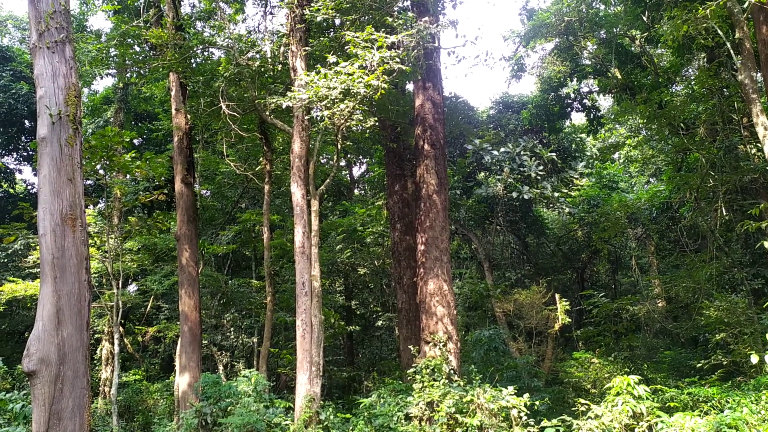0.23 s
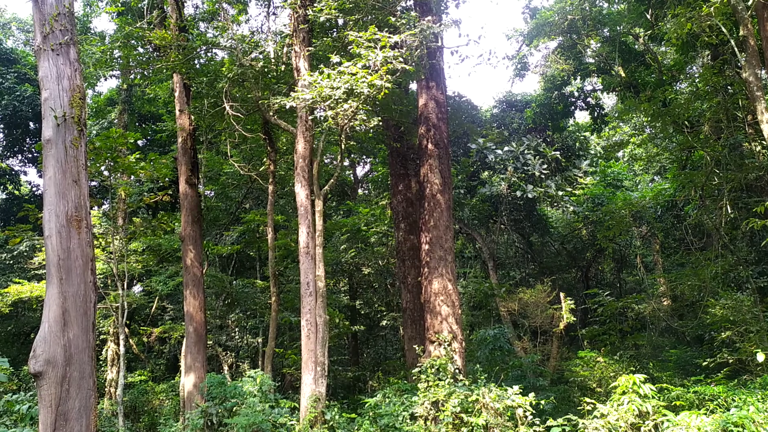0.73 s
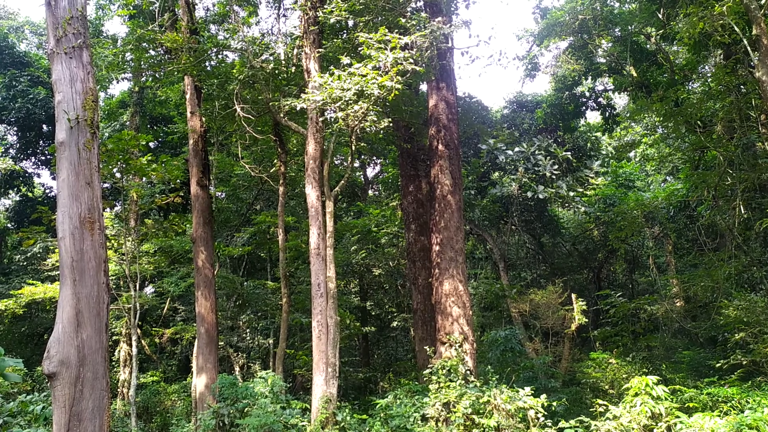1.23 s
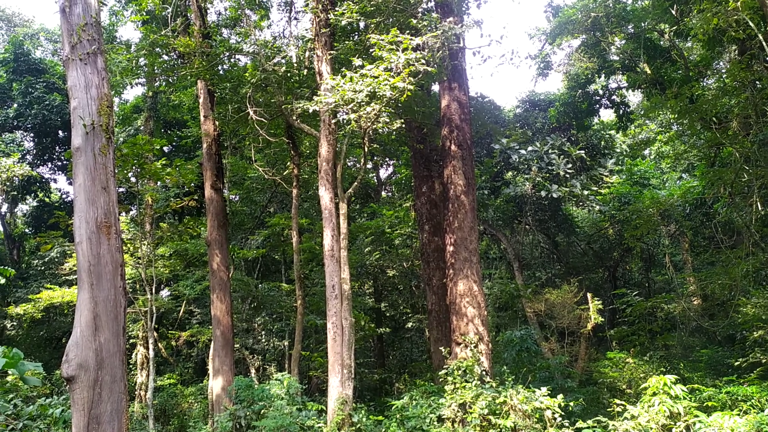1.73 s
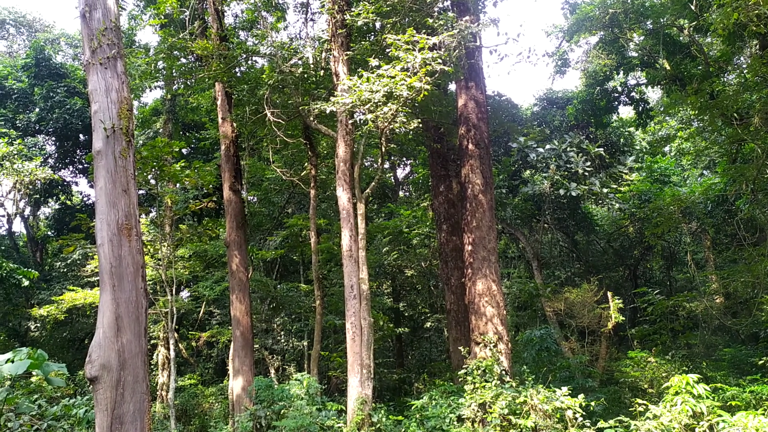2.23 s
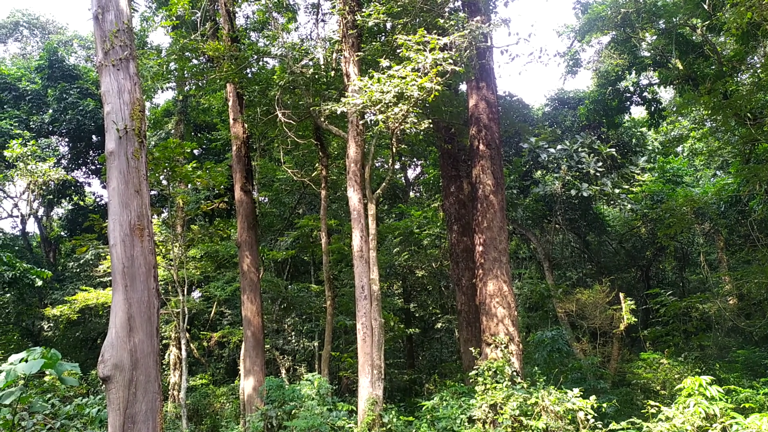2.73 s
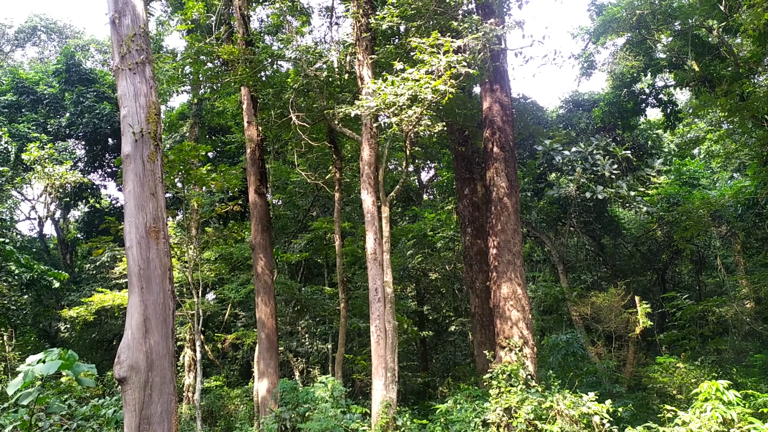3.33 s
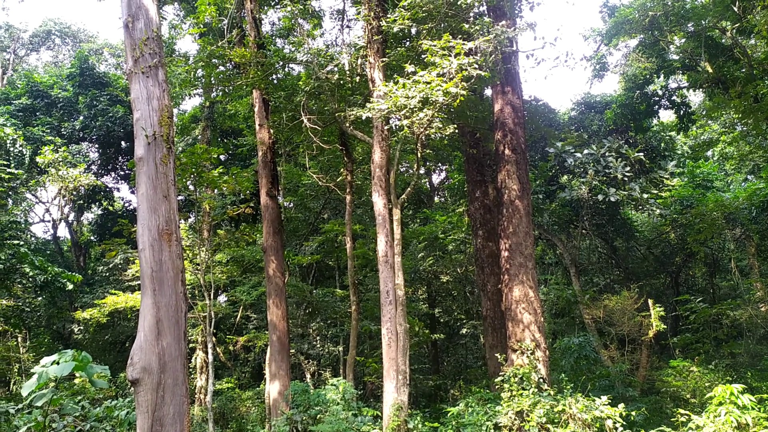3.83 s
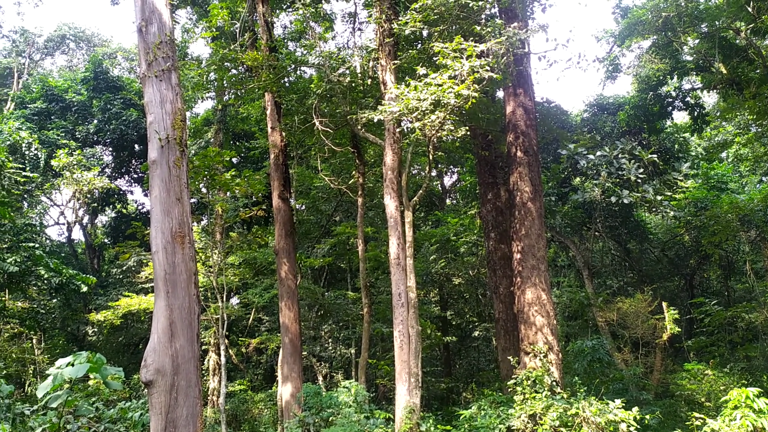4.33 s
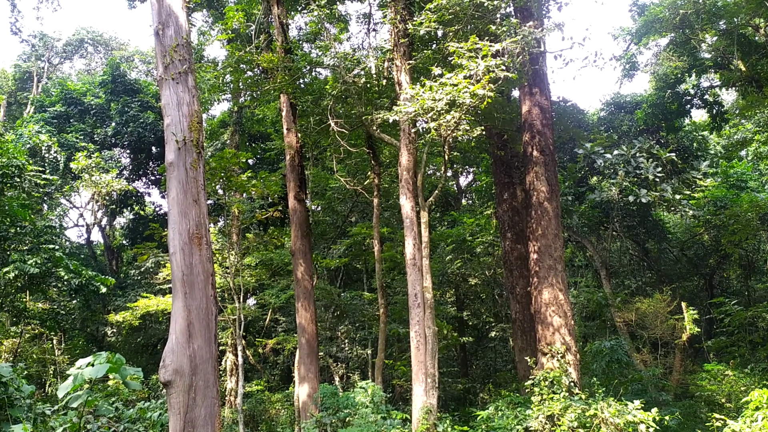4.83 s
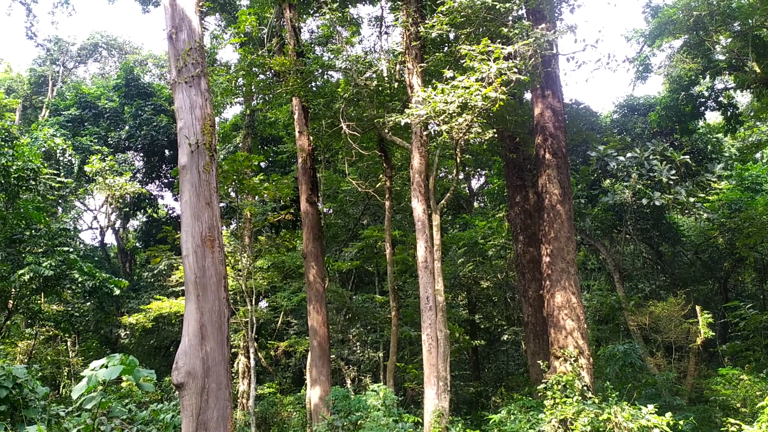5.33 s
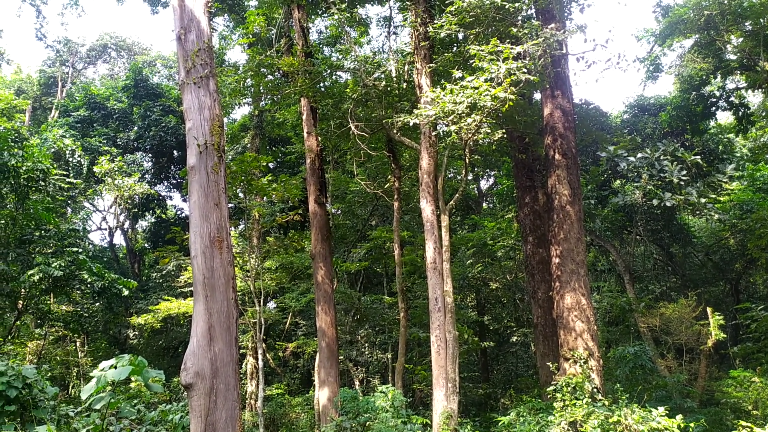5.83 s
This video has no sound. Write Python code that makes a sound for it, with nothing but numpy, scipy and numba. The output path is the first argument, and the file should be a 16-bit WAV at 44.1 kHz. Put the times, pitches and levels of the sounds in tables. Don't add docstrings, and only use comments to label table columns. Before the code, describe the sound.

For the full six seconds a dense cicada chorus rings in a forest, already at full strength at the start and never pausing. It is a hard, glassy, electric whine stacked at roughly 3, 6 and 9 kHz, the two lower tones strongest, trembling with fast beats between many singers over a hazy far chorus. The pitch stays steady; the loudness swells slightly and the image sways, upper tones leaning left. Fingers on the handheld recorder add small dull ticks and rubs, frequent from 0 to 1.1 s, with soft low bumps near 1.0, 1.7 and, most clearly, 1.8 s. Light touches follow around 2.4 and 2.8-3.0 s, then a quieter gap until about 4 s, a cluster at 4.1-4.7 s, and last taps near 5.2, 5.4 and 5.85 s. Faint low air and a distant engine hum sit far beneath. The treble is slightly grainy; the chorus continues to the cut.

```python
import sys
import numpy as np
from scipy import signal
from scipy.fft import rfft, irfft, next_fast_len
from scipy.io import wavfile
from scipy.ndimage import uniform_filter1d
from numba import njit

SR = 44100
rng = np.random.default_rng(int(sys.argv[2]) if len(sys.argv) > 2 else 0)


def rack_gain(trim_db):
    fader = np.asarray(trim_db, float)
    return 10 ** (fader / 20)


def unload_audio(sound):
    columns = np.transpose(np.atleast_2d(sound))
    steps = np.round(np.clip(columns, -1, 1) * 32767)
    wavfile.write(sys.argv[1], SR, steps.astype(np.int16))


N = 267819

OVERTONE_DB = [-91, -65, -70, -39.5, -65.5, -62.5, -75, -67.5, -78, -71.5, -83, -63, -62.5, -35, -62.5,
               -59.5, -76, -66.5, -70.5, -71, -74.5, -61.5, -67.5, -49.5, -69, -65, -80, -71, -82, -77, -77,
               -75.5, -87, -61, -80, -85, -81, -78, -83, -78, -85, -80, -89, -70]
# drum rate off the mean f/Hz, level/dB, left minus right/dB
SINGERS = [(1.6, -10, -1), (1.3, -5.5, 1), (1.0, -2.5, 0), (.75, -1.5, 1), (.55, -.8, 2), (.3, -.6, 1),
           (.05, -.7, 0), (-.2, -1.5, -1), (-.5, -2.5, -1), (-.8, -3.5, -1), (-1.1, -5, -1),
           (-1.45, -7, -2), (-1.8, -10, -2), (-2.3, -15, 0), (-2.8, -19, 0), (-3.3, -21, 0), (-3.8, -21, 0),
           (-4.2, -21, 0), (-4.6, -21, -1), (-5.0, -22, 0), (-5.5, -24, 0)]
# f/Hz, level/dB (per Hz)
FAR_CHORUS = [(2000, -47.5), (2500, -16.5), (3000, 1), (3500, -17), (4900, -18), (5400, -10), (6000, -4),
              (7800, -14.5), (9000, -1), (9700, -18.5), (10800, -17.5), (11600, -9.5), (14000, -21.5),
              (15000, -30), (15200, -28)]
# low f/Hz, high f/Hz
RINGS_HZ = [
    (2870, 3040),
    (5780, 6020),
    (8670, 9030),
]
# level/dB, left minus right/dB, random swell/dB, random sway/dB
RING_LEVELS = [
    (-42, 0, 1.08, 3.5),
    (-39.5, 6.5, 0.88, 2.5),
    (-49, 4, 0.93, 1.5),
]
# f/Hz, left minus right/dB
PORTS = [(2000, 0.5), (4500, -0.7), (5500, 3.5), (7500, 3.5), (10000, 5), (12000, 7.5), (14000, 2.5)]
# t/s, low ring favoured over high rings/dB, left port towards the singers/dB
TURN = [(0, 1, 1.5), (.6, 0.5, 0), (1.2, 1, -1), (1.8, -1.5, -1), (2.2, 2, -2), (2.8, 1, 0),
        (3.3, -0.5, -0.5), (3.8, 0, -1.5), (4.3, .5, -.5), (5, -1, 1), (5.5, -0.5, -0.5), (6.07, 0, -1)]
# t/s, tick level/dB, thump level/dB, brightness/dB
FINGERS = [(0.04, -65.5, -72, -12), (0.169, -52, -69, -14), (0.305, -58.5, -73, -8), (0.568, -60, -76, -6),
           (0.647, -59, -76, -5.5), (0.681, -52.5, -78, -11), (0.881, -54.5, -65, -5.5),
           (0.987, -53, -51, -18), (1.067, -46.5, -60, -21), (1.375, -53, -66, -7), (1.674, -67, -43, -14),
           (1.794, -40, -46, -31), (1.993, -57, -64, -5.5), (2.403, -60, -81, -11), (2.423, -52, -78, 0),
           (2.81, -56, -69, -17), (2.987, -61, -72, -8), (3.035, -62, -74, -14), (3.96, -62, -77, -17),
           (4.124, -61, -62, -2), (4.277, -56, -65, -11), (4.375, -63.5, -67, -5), (4.469, -62, -56, -1),
           (4.622, -63, -77, -4), (4.667, -57.5, -78, -4), (5.206, -62.5, -74, -5), (5.417, -55, -78, 1.5),
           (5.828, -63, -78.5, -4), (5.87, -56, -67, -21)]
# start t/s, length/s, rumble level/dB, rustle level/dB, squeak level/dB
SLIDES = [(0, 0.072, -68, -69.5, -80), (0.168, 0.024, -74, -64.5, -68.5), (0.873, 0.032, -67, -64, -63.5),
          (1.0, .03, -55, -63, -76), (1.08, .04, -58, -63, -74), (1.25, .05, -70, -72, -64),
          (1.152, 0.35, -70.5, -72, -70), (1.67, .1, -53, -68, -84), (1.795, .03, -54, -64, -83),
          (1.85, .24, -64, -74, -78), (2.396, 0.025, -76, -66.5, -69.5), (2.797, .05, -66, -73, -74),
          (3.196, .12, -72, -84, -85), (4.098, .07, -72.5, -77, -82), (4.47, .06, -66, -74, -80),
          (4.6, .1, -76, -69, -76), (5.046, 0.053, -78, -80, -80), (5.833, 0.053, -75, -70, -73.5)]
HOLD_DB = [
    -79,
    -78,
    -84,
]
# f/Hz, level/dB (per Hz)
AIR = [(25, -34), (45, -2.5), (63, -3.5), (80, -13.5), (110, -6.5), (240, -16), (600, -19.5), (1300, -22.5),
       (2100, -21.5), (2600, -41), (4000, -92)]
# f/Hz, level/dB
ROUNDING_STEP = [(300, -20.5), (900, 0), (2200, -4), (3000, -5), (3500, 7.5), (5100, 8), (5900, -10.5),
                 (7000, 5), (7900, 7), (8900, -11), (10200, 10), (11800, -3.5), (13500, 5.5), (15000, 2),
                 (15400, 15)]

DRUM_HZ, CYCLE_POINTS = 296.3, 1 << 14
CHORUS_DB, FAR_DB = -33.5, -21
SWELL_PER_S, SWAY_PER_S = 7, 9
TICK_HZ, HZ_PER_BRIGHT_DB, HZ_PER_THUMP_DB, TICK_PAN_DB = 235, 4, -4.5, 5
SLIDE_ATTACK_S, SLIDE_RELEASE_S = 0.013, 0.031
AIR_DB, HUM_HZ, HUM_DB = -72.5, 52.3, -70.5
TIME = np.arange(N) / SR
SIZE = next_fast_len(N, True)
FREQ = np.arange(SIZE // 2 + 1) * SR / SIZE + 1


def chorus():
    song = np.zeros((2, N))
    for off_hz, db, pan_db in SINGERS:
        singer = cicada(DRUM_HZ + off_hz, drift=.0008, tremble=.001, patchy_db=2.5, leaves_db=2.5)
        song += rack_gain(db) * sides(pan_db)[:, None] * singer
    uneven = 1 + 0.045 * flutter(corner_hz=46.2, flare_db=4.0)
    song = shimmer(level(song, 0) * uneven, spread_db=1.0, size=8, count=4)
    far = shimmer(colour(rng.standard_normal((2, N)), FAR_CHORUS), spread_db=5.5, size=5, count=3)
    song = song + level(far, FAR_DB)

    t, *columns = np.transpose(TURN)
    favour_db, turn_db = (np.interp(TIME, t, c) for c in columns)
    spectrum = rfft(song, SIZE)
    inside = [(FREQ >= lo) & (FREQ < hi) for lo, hi in RINGS_HZ]
    facing = sides(np.interp(FREQ, *np.transpose(PORTS)))
    weak = spectrum * facing * ~np.any(inside, axis=0)
    out = rack_gain(CHORUS_DB) * irfft(weak, SIZE)[:, :N]
    for mask, (db, pan_db, swell_db, sway_db), lean in zip(inside, RING_LEVELS, (1, -.5, -.5)):
        rings = even(irfft(spectrum * mask, SIZE)[:, :N], 0.13)
        gain = rack_gain(db + 3.0 + lean * favour_db + swell_db * walk(SWELL_PER_S))
        pan = sides(pan_db + turn_db + sway_db * walk(SWAY_PER_S))
        out = out + rings * gain * pan
    return out


def cicada(hz, drift, tremble, patchy_db, leaves_db):
    turns = np.cumsum(hz * (1 + drift * walk(1.5) + tremble * walk(9))) / SR
    ports = []
    for _ in range(2):
        chance = rng.standard_normal((2, len(OVERTONE_DB)))
        lines = np.zeros(CYCLE_POINTS // 2 + 1, complex)
        heights = rack_gain(np.add(OVERTONE_DB, patchy_db * chance[0]))
        lines[7:7 + len(OVERTONE_DB)] = heights * np.exp(9j * chance[1])
        cycle = irfft(lines) * CYCLE_POINTS
        stretch = .025 * walk(1.2) + .004 * walk(5)
        ports.append(play(cycle, turns + stretch, rack_gain(leaves_db * walk(4.97))))
    return np.array(ports)


@njit
def play(cycle, turns, gain):
    out = np.empty(len(turns))
    for i in range(len(turns)):
        place = (turns[i] - np.floor(turns[i])) * len(cycle)
        k = int(place)
        step = cycle[(k + 1) % len(cycle)] - cycle[k]
        out[i] = gain[i] * (cycle[k] + (place - k) * step)
    return out


def flutter(corner_hz, flare_db):
    slow = signal.butter(1, corner_hz, fs=SR, output="sos")
    fast = signal.butter(1, 11.0 * corner_hz, fs=SR, output="sos")
    noise = signal.sosfilt(np.vstack((slow, fast)), rng.standard_normal((2, N)))
    return level(noise, 0) * rack_gain(flare_db * walk(6.3))


def shimmer(x, spread_db, size, count):
    z = signal.stft(x, nperseg=1024)[2]
    patches = uniform_filter1d(rng.standard_normal(z.shape), size, axis=1)
    patches = uniform_filter1d(patches, count, axis=2)
    return signal.istft(z * rack_gain(spread_db * patches / patches.std()), nperseg=1024)[1][:, :N]


def even(x, span_s):
    span = int(span_s * SR)
    return x / np.sqrt(uniform_filter1d(uniform_filter1d(x ** 2, span), span))


def fingers():
    out, t = np.zeros((2, N)), np.arange(int(.2 * SR)) / SR
    places = rng.standard_normal((len(FINGERS), 1))
    for (s, tick_db, thump_db, bright_db), place in zip(FINGERS, places):
        hz = TICK_HZ + HZ_PER_BRIGHT_DB * (bright_db + 12) + HZ_PER_THUMP_DB * (thump_db + 73.5)
        body = ring(t, max(hz, 150), 0.0035, 0.0018) * rack_gain(2.5)
        edge = ring(t, 767, 0.0012, 0.00093)
        edge = edge + rack_gain(-10) * ring(t, 1200, .001, .0007) + rack_gain(-9) * ring(t, 480, .002, .001)
        tick = body + edge * rack_gain(bright_db + 10)
        thump = ring(t, 70.8, 0.017, 0.0032) * rack_gain(thump_db + 2.5)
        sound = tick * rack_gain(tick_db) + thump
        i = int((s + 0.00304) * SR)
        out[:, i:i + len(t)] += (sound * sides(TICK_PAN_DB * place))[:, :N - i]
    skin = rng.standard_normal((3, N))
    rumble = level(band(skin[0] + 0.66 * skin[1:], 53, 105) * rack_gain(2.5 * walk(16)), -1.8)
    rustle = level(band(skin[0] + 0.92 * skin[1:], 95, 335) * rack_gain(4.5 * walk(30)), -5.5)
    squeak = level(band(skin[0] + .8 * skin[1:], 450, 944) * rack_gain(4.2 * walk(45)), -6.5)
    return out + rumble * slide(0) + rustle * slide(1) + squeak * slide(2)


def ring(t, hz, decay_s, rise_s):
    return np.sin(2 * np.pi * hz * t) * np.exp(-t / decay_s) * (1 - np.exp(-t / rise_s))


def slide(column):
    gain = np.full(N, rack_gain(HOLD_DB[column]))
    for start, length, *db in SLIDES:
        rise = np.clip((TIME - start) / SLIDE_ATTACK_S + 1, 0, 1)
        fall = np.exp(-np.maximum(TIME - start - length, 0) / SLIDE_RELEASE_S)
        gain = gain + rack_gain(db[column]) * rise * fall
    return gain


def air():
    mid, side = colour(rng.standard_normal((2, N)), AIR)
    side = colour(side, [(40, -4), (150, -3.0), (500, -2.5), (1200, 2.0), (2000, 1.5)])
    breath = level(np.array([mid + side, mid - side]), AIR_DB) * rack_gain(1.4 * walk(8))
    hum_turns = np.cumsum(HUM_HZ * (1 + 0.0098 * walk(2.3))) / SR
    hum = np.sin(2 * np.pi * hum_turns) * rack_gain(2.6 * walk(5.1))
    return breath + level(hum, HUM_DB)


def level(x, db):
    return x * rack_gain(db) / np.sqrt(np.mean(x ** 2))


def walk(rate):
    k = max(int(SR / 64 / rate), 2)
    w = np.repeat(rng.standard_normal(N // 128), k)[:N // 64 + 2]
    w = uniform_filter1d(uniform_filter1d(w, k), k)
    return np.interp(TIME, np.arange(len(w)) * 64 / SR, w / w.std())


def colour(x, points):
    hz, db = np.transpose(points)
    gain = rack_gain(np.interp(np.log(FREQ), np.log(hz), db))
    return irfft(rfft(x, SIZE) * gain, SIZE)[..., :N]


def band(x, lo_hz, hi_hz):
    return signal.sosfilt(signal.butter(3, [lo_hz, hi_hz], "band", fs=SR, output="sos"), x)


def sides(db):
    return rack_gain(np.array([db, -db]) / 2)


def scene():
    return chorus() + fingers() + air()


def coarse_steps(x, whim_db, size):
    f, _, z = signal.stft(x, SR, "cosine", nperseg=2048)
    db = 20 * np.log10(np.abs(z) + 1e-12)
    floor = uniform_filter1d(uniform_filter1d(db, 2 * size, axis=1), size, axis=2)
    whim = rng.standard_normal((len(f) // size + 1, z.shape[2]))
    whim = np.repeat(whim, size, axis=0)[:len(f)]
    step = rack_gain(floor + np.interp(f, *np.transpose(ROUNDING_STEP))[:, None] + whim_db * whim)
    real = step * np.fix(z.real / step + .4 * np.sign(z.real))
    imag = step * np.fix(z.imag / step + .4 * np.sign(z.imag))
    return signal.istft(real + 1j * imag, SR, "cosine", nperseg=2048)[1][:, :N]


def roll_off(x):
    return signal.sosfilt(signal.butter(12, 15760, fs=SR, output="sos"), x)


def record(dry):
    heard = signal.sosfilt(signal.butter(3, 40, "high", fs=SR, output="sos"), dry)
    mix = coarse_steps(heard, whim_db=8, size=16)
    return roll_off(mix)


dry = scene()
out = record(dry)
unload_audio(out)
```